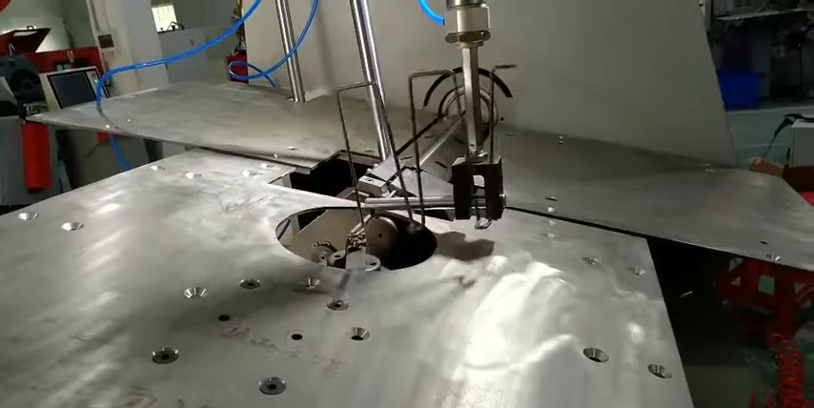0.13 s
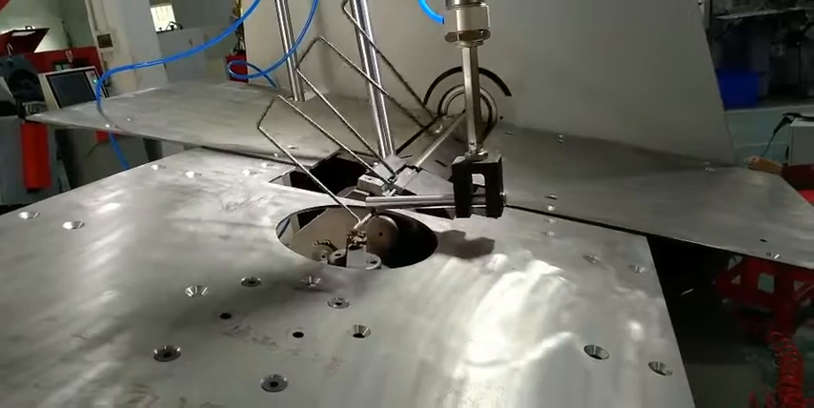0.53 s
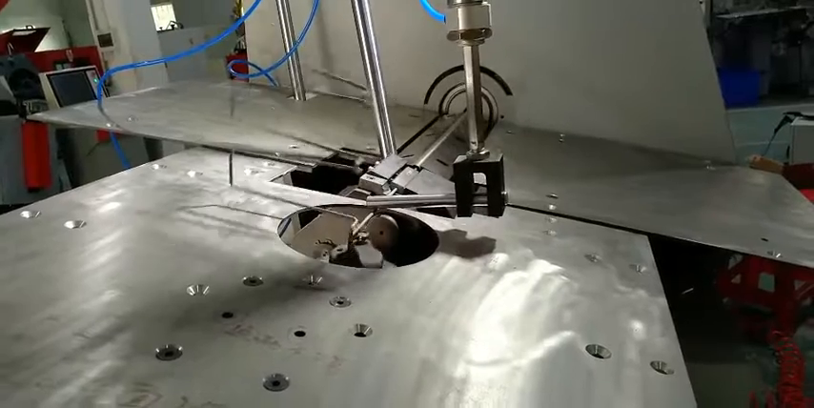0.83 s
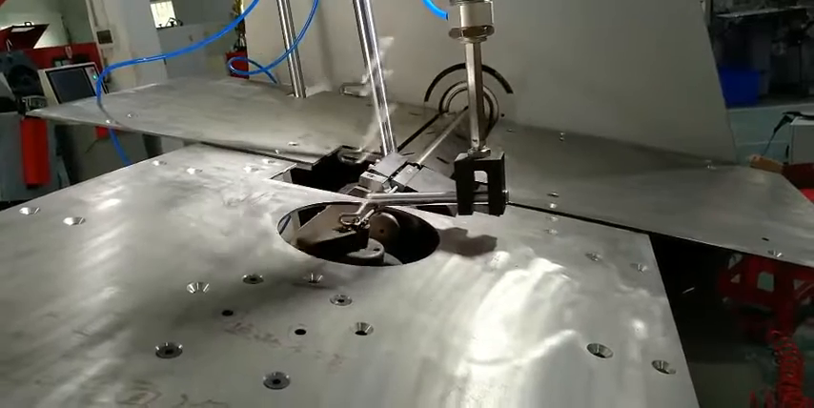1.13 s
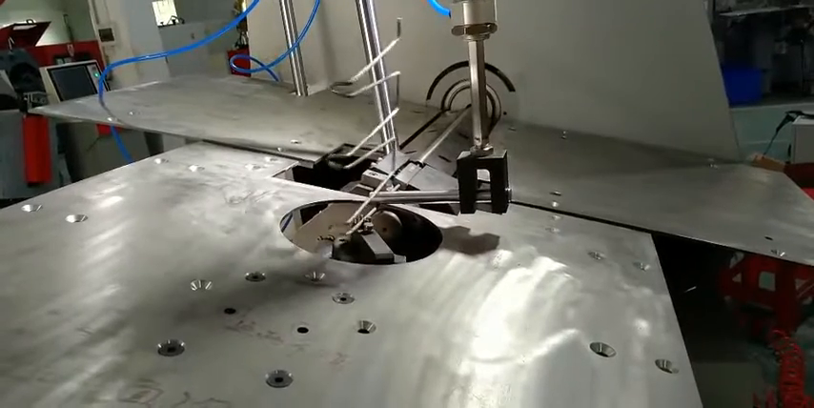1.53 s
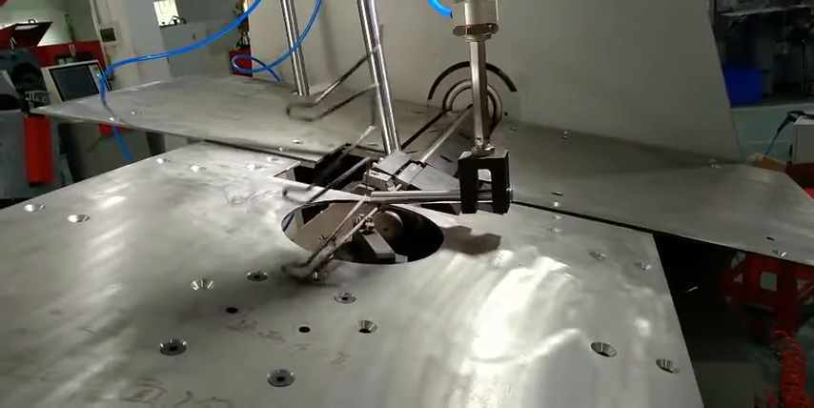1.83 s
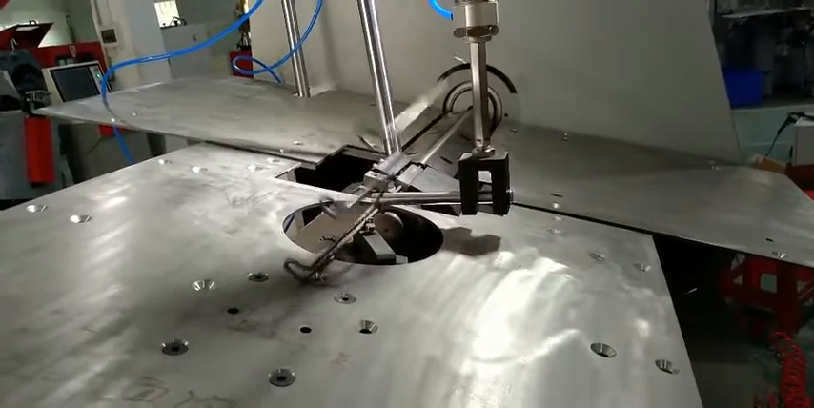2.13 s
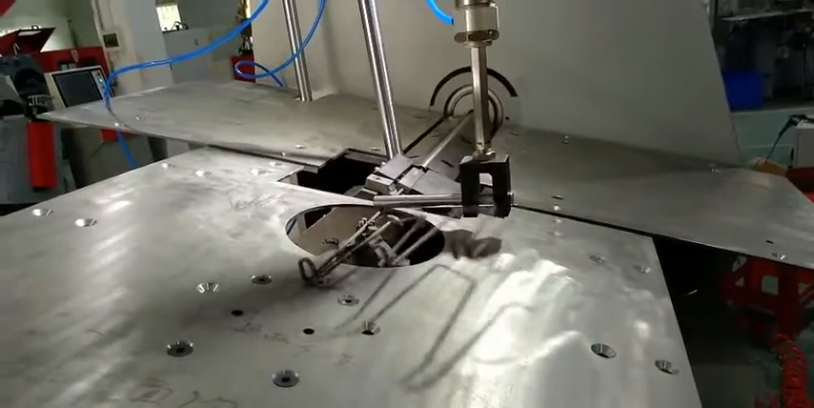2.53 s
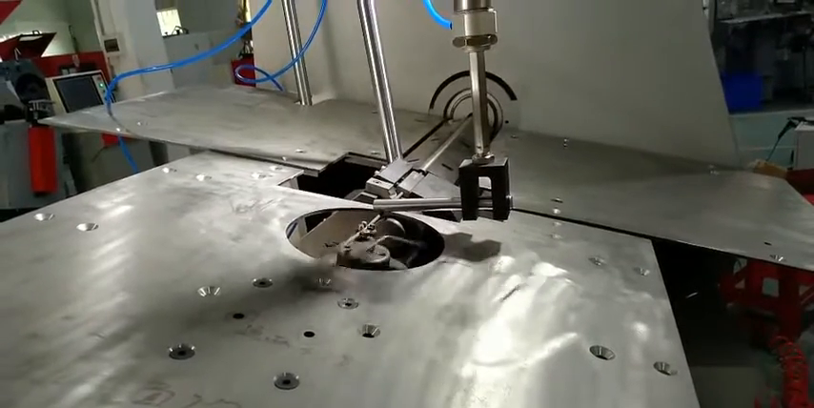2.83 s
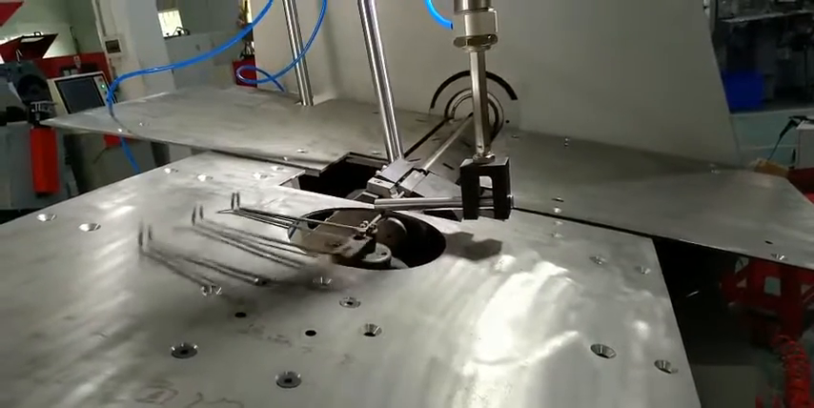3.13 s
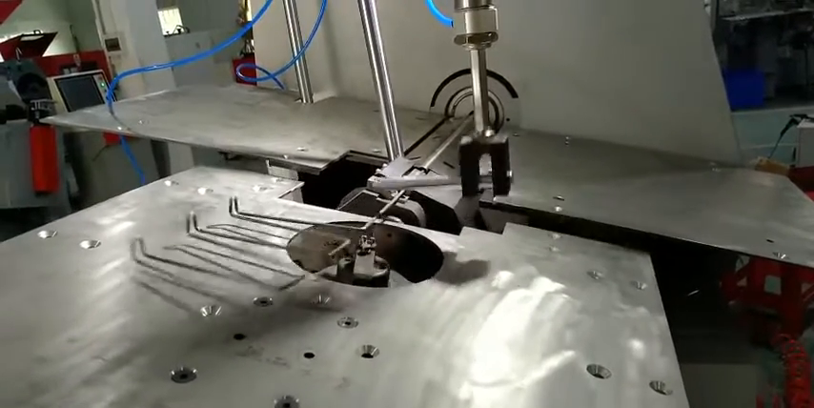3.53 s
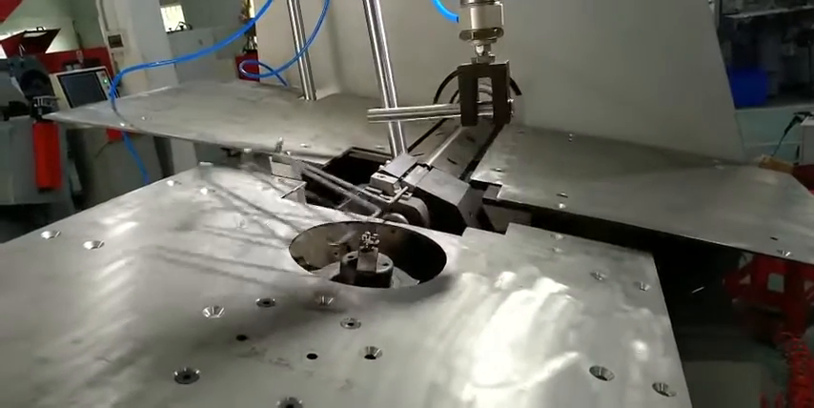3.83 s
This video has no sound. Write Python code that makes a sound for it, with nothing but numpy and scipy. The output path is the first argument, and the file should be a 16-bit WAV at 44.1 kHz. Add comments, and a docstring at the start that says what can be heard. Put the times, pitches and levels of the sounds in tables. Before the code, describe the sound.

A wire forming machine in a quiet workshop shudders low with faint servo whines, growls through a fast bend, then the wire clatters and rings on the steel table before a heavy rumble. Close microphone.

```python
"""A quiet shop, with a low hum and faint hiss, where a wire forming machine works.
Its servo axes whine faintly and shudder through the frame: wavering tones in shaped noise.
A fast bending stroke growls in the gears, and the wire squeaks round the bending pin.
The bent wire form chatters on the steel table and rings out: each contact feeds fading resonances.
Then the head travels with a heavy rumble and the tooling clanks lightly."""
import sys
import numpy as np
from scipy import signal
from scipy.fft import rfft, irfft, next_fast_len
from scipy.io import wavfile
from scipy.ndimage import map_coordinates

SR = 44100
rng = np.random.default_rng(int(sys.argv[2]) if len(sys.argv) > 2 else 0)


def master(y):
    """Save y as 16-bit WAV."""
    cut = np.clip(np.atleast_2d(y).T, -1, 1)
    pcm = np.round(cut * 32767)  # scale
    wavfile.write(sys.argv[1], SR, pcm.astype(np.int16))


N = 176400
T = np.arange(N) / SR  # time in seconds

# the wire form meets the table; the three levels start the wire, the table and the click
# columns: start_s [s], wire_db [dB], table_db [dB], click_db [dB]
CONTACT_ROWS = [(3.082, -73, -105, -100), (3.112, -62, -90, -85), (3.214, -56, -80, -68),
                (3.248, -55, -72, -62), (3.281, -50, -57, -58), (3.294, -48, -59, -50),
                (3.3495, -51, -60, -39), (3.385, -43.5, -57, -35.5), (3.390, -48.5, -58, -42),
                (3.407, -50, -60, -46)]
# relative spectrum of a hard steel click; columns: pitch_hz [Hz], level_db [dB]
CLICK_COLOUR = [(500, -11), (1400, -23), (2000, -24.5), (3800, 20.5), (6000, -9.5), (9000, -27),
                (12000, -24), (16000, -57)]
CLICK_T60_S = .016  # time for a click to fall by 60 dB
WIRE_ATTACK_S = .003


def amp(db):
    """Turn decibels into a gain."""
    return 10 ** (np.asarray(db) / 20)


def unit(x):
    """Scale a sound to an average (rms) level of 1."""
    return x / np.sqrt(np.mean(x ** 2) + 1e-20)


def along(points, hz):
    """Read a curve of (Hz, value) points on a log frequency axis."""
    f, v = np.transpose(points)
    return np.interp(np.log(hz + 1), np.log(f + 1), v)


def gains(rows):
    """Make a gain curve for each dB column, silent well outside the table's times."""
    times, *columns = np.transpose(rows)
    inside_s = np.minimum(T - times[0], times[-1] - T)
    gate = np.clip(inside_s / .02 + 2, 0, 1)
    return [gate * amp(np.interp(T, times, column)) for column in columns]


def wobble(rate):
    """Make a smooth random curve with `rate` random points a second."""
    coarse = T[::8]
    points = rng.standard_normal(4000)
    return np.interp(T, coarse, map_coordinates(points, [coarse * rate], mode="wrap"))


def filtered(x, response):
    """Shape the spectrum of x with a gain that depends on frequency."""
    m = next_fast_len(N + SR // 4)
    hz = np.fft.rfftfreq(m, 1 / SR)
    return irfft(rfft(x, m) * response(hz), m)[:N]


def noise(colour):
    """Make noise of rms 1 whose spectrum follows (Hz, dB) points."""
    return unit(filtered(rng.standard_normal(N), lambda hz: amp(along(colour, hz))))


def tone(hz):
    """Make a sine of rms 1 that follows a frequency curve."""
    cycles = np.cumsum(hz) / SR + rng.random()
    return np.sqrt(2) * np.sin(2 * np.pi * cycles)


def fuzzy_tone(hz, width_hz):
    """Make narrow noise of about rms 1 round one frequency."""
    phase = 2 * np.pi * hz * T
    return wobble(width_hz) * np.cos(phase) + wobble(width_hz) * np.sin(phase)


def notes(table, voice, edge_s):
    """Play tones with soft edges from (start, length, Hz, dB) rows."""
    total = 0
    for start, length, hz, db in table:
        inside_s = np.minimum(T - start, start + length - T)
        fade = .5 + .5 * np.tanh(2 * inside_s / edge_s)
        total = total + amp(db) * fade * voice(hz)
    return total


def blows(times, db):
    """Put in energy at single instants."""
    return np.bincount(np.round(np.asarray(times) * SR).astype(int), amp(db) ** 2, N)[:N]


def spread(drive, rise_s):
    """Put in the same energy gradually."""
    window = np.hanning(int(rise_s * SR) + 2)
    return signal.fftconvolve(drive, window / window.sum())[:N]


def ringing(drive, t60):
    """Follow the loudness of a body that stores energy and loses 60 dB of it in t60 seconds."""
    keep = np.exp(-np.log(1e6) / (t60 * SR))  # share of the energy left after one sample
    energy = signal.lfilter([1], [1, -keep], drive)
    return np.sqrt(np.abs(energy))


def modes(table, drive, wander_hz):
    """Ring slightly unsteady pure tones, all fed by one drive."""
    return sum(amp(db) * ringing(drive, t60) * tone(hz + wander_hz * wobble(60))
               for hz, db, t60 in table)


def dense_modes(colour, ragged_db):
    """Make noise of rms 1 with a ragged spectrum, like many close resonances."""
    peaks = np.clip(rng.standard_normal(2000), -1.8, 1.8)
    spacing_hz = 24
    ragged = lambda hz: amp(ragged_db * np.interp(hz / spacing_hz, np.arange(len(peaks)), peaks))
    return unit(filtered(noise(colour), ragged))


def resonant(table):
    """Add fuzzy resonances from (Hz, width, dB) rows, rms 1 together."""
    return unit(sum(amp(db) * fuzzy_tone(hz, width) for hz, width, db in table))


def idle():
    """The shop's steady background is low noise, one wavering hum tone and a faint hiss."""
    # relative spectra; columns: pitch_hz [Hz], level_db [dB]
    hum_colour = [(15, -21.5), (28, 2), (50, 3.5), (75, -6), (105, -2.5), (160, -14.5), (215, -14),
                  (262, -20.5), (410, -28), (1150, -42), (2100, -46), (3800, -47.5), (6200, -56),
                  (9000, -59), (12000, -104.5)]
    hiss_colour = [(5500, -23.5), (7400, -9), (8100, -7.5), (8650, -3.5), (9300, -0.5), (9850, -7.5),
                   (10600, -1.5), (11400, -10.5), (12700, -11.5), (13200, -63.5)]
    hum_tone = amp(-81) * tone(262 + 4 * wobble(20))
    return amp(-62.5) * noise(hum_colour) + hum_tone + amp(-92.5) * noise(hiss_colour)


def servos():
    """Thin, flickering whines swell and fade as the drives hold and move."""
    # columns: start_s [s], length_s [s], pitch_hz [Hz], level_db [dB]
    whine_rows = [(-.03, 0.091, 3779, -81.5), (0.28, 0.07, 3770, -86), (0.324, 0.33, 2940, -84),
                  (.5, 0.45, 4190, -96), (0.61, 0.25, 3770, -83), (0.758, .07, 4613, -90),
                  (.58, 0.33, 6270, -101), (2.1, 0.39, 2936, -95), (0.86, 0.4, 3788, -87),
                  (0.974, 0.11, 2950, -86.5), (.03, 0.12, 3340, -92.5), (1.645, 0.083, 4160, -87),
                  (1.77, 0.22, 2104, -91), (1.97, 0.076, 2115, -83.5), (2.1, 0.28, 3779, -90.5),
                  (2.232, 0.16, 2924, -86), (2.264, 0.13, 2110, -93.5), (2.4, 0.15, 3765, -86)]
    rough, width_hz, flutter_db = .8, 90, 1.8

    def whine(hz):
        """One whine is a wavering sine mixed with narrow noise, with a fluttering level."""
        mixed = tone(hz + 10 * wobble(30)) + rough * fuzzy_tone(hz, width_hz)
        return unit(amp(flutter_db * wobble(30)) * mixed)

    return notes(whine_rows, whine, edge_s=0.04)


def turning():
    """The slow bending axis shudders: a low wavering tone in frame rumble."""
    # shared level before the trims below; columns: time_s [s], level_db [dB]
    turn_rows = [(0.0, -42.5), (0.128, -44.5), (0.184, -57), (0.262, -42), (0.29, -53), (0.398, -47),
                 (0.556, -64), (0.786, -61), (0.864, -69.5), (0.904, -60), (0.992, -65), (1.074, -47.5),
                 (1.146, -53.5), (1.272, -79.5), (1.388, -66), (1.45, -77)]
    # relative spectrum of the rumble; columns: pitch_hz [Hz], level_db [dB]
    turn_colour = [(20, -20.5), (48, 2.5), (80, -5.5), (150, -6), (200, -27.5), (330, -33), (500, -45.5),
                   (1000, -54.5), (4000, -125)]
    level, = gains(turn_rows)
    shudder = amp(-2.5) * tone(94.3 + 4 * wobble(25))
    rumble = amp(-2) * noise(turn_colour)
    return level * (shudder + rumble)


def jolts():
    """Starts and stops rock the frame: short low pulses under a bell-shaped swell."""
    # half_s sets the width of the swell (its standard deviation)
    # columns: time_s [s], peak_db [dB], pitch_hz [Hz], half_s [s]
    jolt_rows = [(1.377, -46, 75.6, 0.0035), (1.515, -41, 67, 0.0023), (1.639, -33, 104, 0.0024),
                 (1.718, -41.5, 90, 0.0053), (3.272, -40.5, 81, 0.0032), (3.761, -26.5, 73, 0.0087),
                 (3.932, -27, 86, 0.007)]
    total = 0
    for time, db, hz, half in jolt_rows:
        swell = np.exp(-((T - time) / half) ** 2 / 2)
        total = total + amp(db) * swell * np.cos(2 * np.pi * hz * (T - time))
    return total


def growl(resonances):
    """Narrow, fluttering gearbox resonances are shaken by the meshing teeth."""
    flutter_db = 2.5
    return sum(amp(db + flutter_db * wobble(45)) * tone(hz + width / 2 * wobble(70))
               for hz, width, db in resonances)


def bending(rumble_db=-2.0, low_db=-3.5, high_db=-3.0):
    """The fast stroke shakes the frame and sets the gearbox growling."""
    # levels before the trims in the arguments
    # columns: time_s [s], rumble_db [dB], low_growl_db [dB], high_growl_db [dB]
    bend_rows = [(1.45, -72, -83.5, -89.5), (1.53, -55.5, -75, -93), (1.575, -41, -50, -79),
                 (1.62, -43.5, -55, -71), (1.66, -42, -62.5, -63), (1.725, -51.5, -47.5, -63.5),
                 (1.775, -66, -61.5, -59.5), (1.815, -56.5, -61.5, -63), (1.875, -58.5, -49.5, -59.5),
                 (1.93, -59, -60.5, -68.5), (2, -67, -79, -74), (2.06, -75, -78, -89), (2.1, -84, -74, -90),
                 (2.122, -74, -72, -74), (2.17, -73.5, -88, -96)]
    # relative spectrum of the frame; columns: pitch_hz [Hz], level_db [dB]
    bend_colour = [(20, -21), (65, 4), (105, -1), (140, -6.5), (198, 1), (235, -4.5), (300, -2), (400, -29),
                   (700, -41), (2000, -72)]
    # gearbox resonances; columns: pitch_hz [Hz], width_hz [Hz], level_db [dB]
    low_gears = [(266, 26, -1.5), (296.3, 26.04, -2), (337, 34, -8.5), (399, 56, -23.5)]
    high_gears = [(496, 60, -16.5), (532, 26, -3.5), (565, 14, -2.5), (585, 28, -7), (639, 49, -5.5)]
    rumble, low, high = gains(bend_rows)
    frame = amp(rumble_db) * rumble * noise(bend_colour)
    low_growl = amp(low_db) * low * growl(low_gears)
    high_growl = amp(high_db) * high * growl(high_gears)
    return frame + low_growl + high_growl


def squeak():
    """The wire slips once on the bending pin: narrow noise bands swell, then fade."""
    # relative resonances of the wire; columns: pitch_hz [Hz], width_hz [Hz], level_db [dB]
    squeak_rows = [(2600, 180, -12), (3010, 150, -1), (3705, 92, 1), (4220, 300, -8)]
    slip = spread(blows([1.885], [-71]), rise_s=0.029)
    return resonant(squeak_rows) * ringing(slip, t60=0.26)


def singing():
    """Single resonances of wire and table sing out: a sine roughened by narrow noise."""
    # columns: start_s [s], length_s [s], pitch_hz [Hz], level_db [dB]
    sing_rows = [(3.293, 0.047, 2687, -52), (3.293, 0.036, 3725, -53), (3.35, 0.027, 2262, -56),
                 (3.35, 0.019, 3700, -56), (3.386, 0.023, 3400, -57), (2.2, .16, 1137, -85),
                 (3.262, .11, 340, -58), (3.405, 0.075, 431, -60), (3.39, 0.084, 888, -67)]
    return notes(sing_rows, lambda hz: unit(tone(hz) + .5 * fuzzy_tone(hz, 90)), edge_s=0.017)


def contact_clicks():
    """Each contact clicks, then chatters in random light taps that die away."""
    chatter_per_s, chatter_db, chatter_s = 300, -5, .035
    times, wire_db, _, click_db = np.transpose(CONTACT_ROWS)
    pressure = sum(amp(db) ** 2 * (T >= t) * np.exp(-np.abs(T - t) / chatter_s)
                   for t, db in zip(times, wire_db))
    tap_now = rng.random(N) < chatter_per_s / SR
    taps = tap_now * rng.exponential(1, N) * pressure * amp(chatter_db) ** 2
    return ringing(blows(times, click_db) + taps, CLICK_T60_S) * noise(CLICK_COLOUR)


def wire_ring():
    """The wire rings in bands and clear tones, each answering hard contacts in its own measure."""
    # relative spectrum of the wire; columns: pitch_hz [Hz], level_db [dB]
    wire_colour = [(1400, -44), (1900, -12), (2200, -23), (2700, -4.5), (3200, -6), (3500, -4),
                   (3750, -7.5), (4300, -2), (5000, -3), (6200, -8), (7000, -22.5), (8000, -17),
                   (8700, -24.5), (11500, -27), (13000, -50), (16000, -54)]
    # bands of the ring; growth is the dB gained per dB of contact, so outer bands need a hard one
    # columns: pitch_hz [Hz], t60_s [s], growth [dB per dB]
    band_rows = [(1960, 0.74, 1), (2720, 0.49, 0.73), (3680, 0.46, 0.58), (5600, 0.26, 1.17),
                 (6800, 0.49, 1.2), (11140, 0.4, 1.3)]
    # clear modes; columns: pitch_hz [Hz], level_db [dB], t60_s [s]
    mode_rows = [(2250, -15, .5), (2269, -19, .45), (2309, -20, .58), (2684, -17, .3), (3492, -13, .42),
                 (3693, -10, .38), (3745, -10, .42), (4102, -16, .35), (4287, -15, .33), (4710, -19, .38),
                 (5346, -21, .42), (5819, -23, .3)]
    hard_db = -43.5  # at this contact level every growth gives the same drive
    times, wire_db, _, _ = np.transpose(CONTACT_ROWS)

    def drive(growth):
        """Contact energy, with the level differences stretched by growth."""
        return spread(blows(times, hard_db + growth * (wire_db - hard_db)), WIRE_ATTACK_S)

    dense = dense_modes(wire_colour, ragged_db=5.5)
    centres = [row[0] for row in band_rows]
    ring = 0
    for hz, t60, growth in band_rows:
        # full gain at this centre, sloping to zero at its neighbours
        slope = [(centre, centre == hz) for centre in centres]
        band = filtered(dense, lambda f: along(slope, f))
        ring = ring + ringing(drive(growth), t60) * band
    rattle = unit(amp(0.84 * wobble(220)))
    clear = modes(mode_rows, drive(1.34), wander_hz=4)
    return amp(-5) * rattle * ring + clear


def table_ring():
    """The steel table's ring builds up after each push, as a dense wash and a few clear tones."""
    # relative spectrum of the wash; columns: pitch_hz [Hz], level_db [dB]
    table_colour = [(150, -6.5), (300, 6), (480, -1), (600, -23.5), (740, -17.5), (830, -2.5), (1150, -4.5),
                    (1300, -12), (1450, -19.5), (1650, -15.5), (2100, -5.5), (3000, -32)]
    # clear modes before their shared trim; columns: pitch_hz [Hz], level_db [dB], t60_s [s]
    mode_rows = [(350, -8, .35), (431, -4, .6), (888, -9, .75), (1137, -13, 1.2)]
    times, _, table_db, _ = np.transpose(CONTACT_ROWS)
    push = blows(times, table_db)
    swell = ringing(push, t60=0.14) ** 2
    swell = swell * push.sum() / swell.sum()  # same total energy, arriving later
    wash = ringing(swell, t60=0.56) * dense_modes(table_colour, ragged_db=4)
    return wash + amp(-2) * modes(mode_rows, swell, wander_hz=2.93)


def travel():
    """The head rumbles along its guide: low noise with a lumpy level."""
    # columns: time_s [s], level_db [dB]
    travel_rows = [(3.56, -69.5), (3.635, -55), (3.68, -37), (3.735, -43), (3.81, -41), (3.87, -39),
                   (3.93, -40.5), (4, -37)]
    # relative spectrum; columns: pitch_hz [Hz], level_db [dB]
    travel_colour = [(18, -11), (35, 2), (60, 3), (120, -3), (195, -3.5), (290, -7.5), (345, -16.5),
                     (440, -31.5), (530, -22.5), (610, -24), (700, -42), (800, -41.5), (950, -33.5),
                     (1060, -47), (1170, -39.5), (1400, -60), (3000, -100)]
    level, = gains(travel_rows)
    lumps = unit(amp(1.2 * wobble(45)))
    return level * lumps * noise(travel_colour)


def tooling():
    """A light steel clank rings in separate bands and settles with a second touch."""
    # the tooling seats and settles; columns: time_s [s], level_db [dB]
    hit_rows = [(3.841, -62.5), (3.868, -68.5)]
    # relative resonances; columns: pitch_hz [Hz], width_hz [Hz], level_db [dB]
    tool_rows = [(2019, 160, -12), (2638, 180, -3), (3150, 900, 0), (3800, 500, -1), (4700, 900, -6),
                 (6550, 900, -9), (9250, 300, -19), (12500, 900, -18)]
    times, db = np.transpose(hit_rows)
    # only the first touch clicks; both feed the ring
    click = ringing(blows(times[:1], db[:1]), CLICK_T60_S) * noise(CLICK_COLOUR)
    touch = spread(blows(times, db), WIRE_ATTACK_S / 2)
    return click + resonant(tool_rows) * ringing(touch, t60=.24)


def scene():
    """Add all parts of the machine to the idle hum and hiss of the shop."""
    drives = servos() + turning() + jolts() + bending()
    wire_and_table = squeak() + singing() + contact_clicks() + wire_ring() + table_ring()
    return (idle() + drives + wire_and_table + travel() + tooling())[None]


def record(dry):
    """Cut off everything at and above the upper band limit."""
    top_hz = 14300
    return filtered(dry[0], lambda hz: hz < top_hz)[None]


dry = scene()
out = record(dry)
master(out)
```